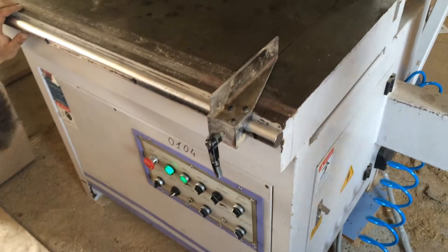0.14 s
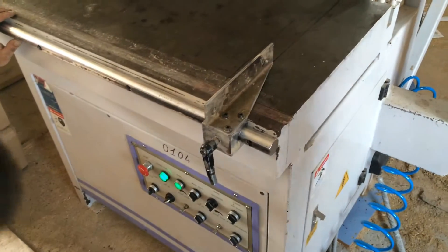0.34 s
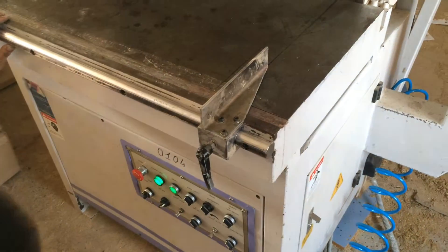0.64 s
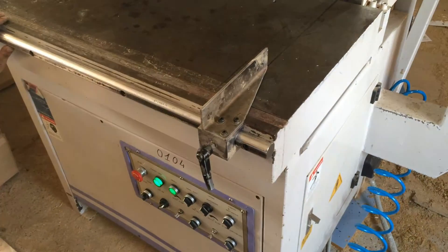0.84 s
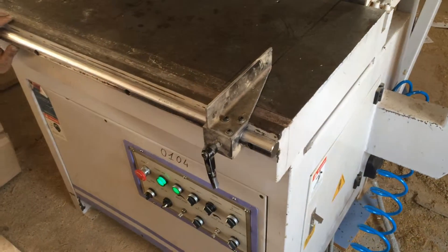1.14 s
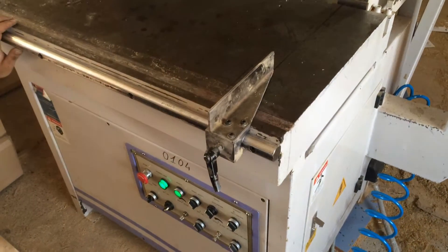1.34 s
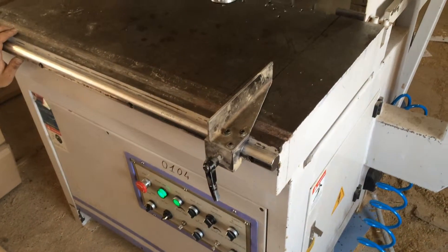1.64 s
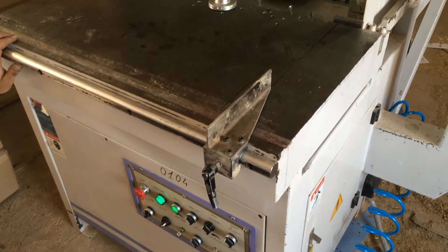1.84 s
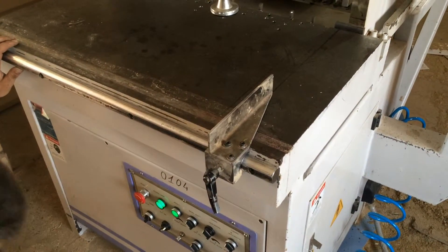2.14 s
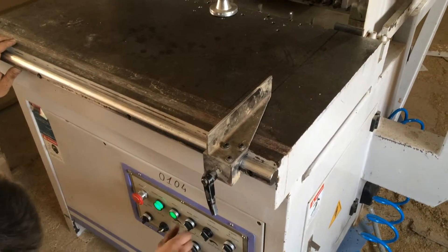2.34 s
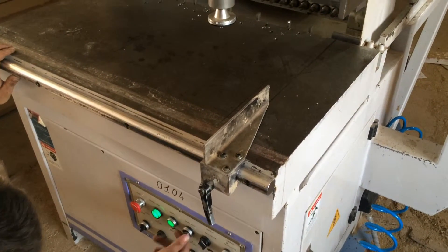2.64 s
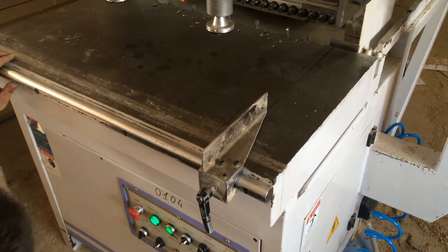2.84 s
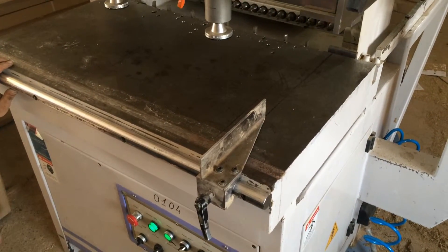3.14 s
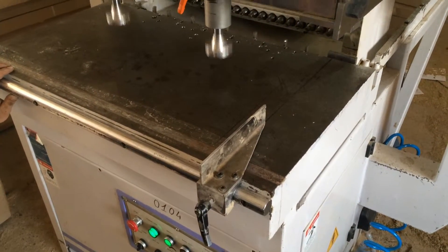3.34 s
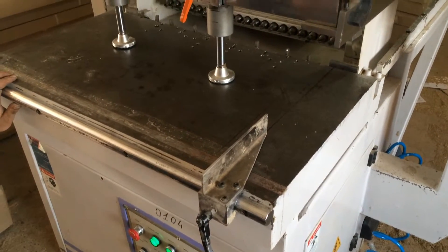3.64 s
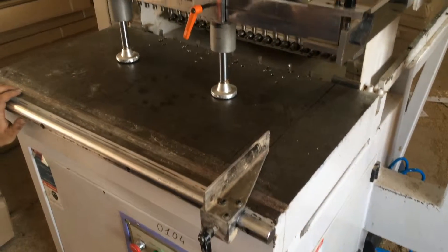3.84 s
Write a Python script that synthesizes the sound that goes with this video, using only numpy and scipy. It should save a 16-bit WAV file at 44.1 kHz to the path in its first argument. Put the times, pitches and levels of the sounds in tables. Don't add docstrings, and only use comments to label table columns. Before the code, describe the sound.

A pneumatic drilling machine idles in a workshop with soft leaking-air hiss and faint low hum. Feet scuff and knock quietly near 0.6 s and 2.3 s. Sharp relay and contactor clicks come at 1.5 and 1.8 s, weaker ones at 2.0 and 2.7. At 3.4 s a valve clacks, air bursts and cylinders thump; from 3.5 clamps clatter on steel, then gear whine and jet hiss grow to the end.

```python
import sys
import numpy as np
from scipy import signal
from scipy.fft import rfft, irfft
from scipy.io import wavfile

SR = 44100
rng = np.random.default_rng(int(sys.argv[2]) if len(sys.argv) > 2 else 0)


def wrap_up_sound(samples):
    columns = np.atleast_2d(samples).T
    tamed = np.clip(columns, -1, 1)
    steps = np.round(tamed * 32767).astype(np.int16)
    wavfile.write(sys.argv[1], SR, steps)


def nominal_scale(level):
    x = np.asarray(level, float) / 20
    return 10 ** x


N = 176400


def rms_one(x):
    return x / np.sqrt(np.mean(x ** 2) + 1e-20)


def envelope(rows):
    time_s, level_db = np.transpose(rows)
    return nominal_scale(np.interp(np.arange(N) / SR, time_s, level_db, left=-120))


def drift(rate_hz):
    step = 40
    r = np.exp(-2 * np.pi * rate_hz * step / SR)
    noise = rng.standard_normal(N // step + 2002)
    slow = signal.lfilter([1], [1, -2 * r, r * r], noise)[2000:]
    return np.interp(np.arange(N) / step, np.arange(len(slow)), rms_one(slow - slow.mean()))


def air(spectrum, resonances):
    hz = np.maximum(np.arange(N // 2 + 1) * SR / N, 1)
    point_hz, point_db = np.transpose(spectrum)
    db = np.interp(np.log(hz), np.log(point_hz), point_db)
    for mid_hz, width_hz, lift_db in resonances:
        db = db + lift_db * np.exp(-.5 * (2 * (hz - mid_hz) / width_hz) ** 2)
    return rms_one(irfft(rfft(rng.standard_normal(N)) * nominal_scale(db) * (hz > 20), N))


def ring(x, hz, t60_s):
    r, w = nominal_scale(-60 / (t60_s * SR)), 2 * np.pi * hz / SR
    return signal.lfilter([0, np.sin(w)], [1, -2 * r * np.cos(w), r * r], x + 1e-18)


def strike(hits, modes, contact_s, spread_db):
    out = np.zeros(N)
    luck = rng.standard_normal((len(hits), len(modes)))
    start_s, level_db = np.transpose(hits)
    push = np.sin(np.pi * np.clip((np.arange(256) + .5) / SR / contact_s, 0, 1)) ** 2
    for k, (hz, mode_db, t60_s) in enumerate(modes):
        force = np.zeros(N)
        force[(start_s * SR).astype(int)] = nominal_scale(level_db + mode_db + spread_db * luck[:, k])
        out += ring(force, hz, t60_s)
    low_cut = signal.butter(4, .75 * modes[0][0], "high", fs=SR, output="sos")
    return signal.sosfilt(low_cut, np.convolve(out, push / push.sum())[:N])


def burst(hits, noise, t60_s):
    start_s, level_db = np.transpose(hits)
    power = np.zeros(N)
    power[(start_s * SR).astype(int)] = nominal_scale(2 * level_db)
    decay = nominal_scale(-120 / (t60_s * SR))
    return noise * np.sqrt(signal.lfilter([1], [1, -decay], power + 1e-18))


def shop(x):
    t60_s, dull_hz = 0.47, 5300
    t = np.arange(SR // 2) / SR
    dull = np.exp(-2 * np.pi * dull_hz / SR)
    tail = signal.lfilter([1], [1, -dull], rng.standard_normal(SR // 2))
    tail = tail * nominal_scale(-60 * t / t60_s) * (t > .006)
    return signal.fftconvolve(x, tail / np.sqrt(np.sum(tail ** 2)))[:len(x)]


def mains_hum():
    hum_hz, hum_db, wobble_db = 100.2, -59.5, 1.5
    tone = np.sin(2 * np.pi * hum_hz * np.arange(N) / SR)
    return np.sqrt(2) * nominal_scale(hum_db + wobble_db * drift(11)) * tone


# pitch_hz, density_db (per Hz)
LEAK_SPECTRUM = [(18, -48), (30, -6), (97, -5.5), (321, -9.5), (667, -13), (1280, -2.5), (1750, -6.5),
                 (3100, -7.5), (15200, -12)]
# pitch_hz, width_hz, lift_db
CABINET_RESONANCES = [(30, 19, -14.5), (104, 175, -2.5), (201.2, 26, 6.5), (327.5, 64, 11),
                      (1260, 900, 1.5), (2420, 700, 3.5), (3460, 650, 8.5), (4780, 720, 9), (7470, 1500, 2),
                      (10500, 320, -6.5), (15200, 1500, -7)]
# time_s, level_db
SUPPLY_PRESSURE = [(0, 0), (3.4, 0), (3.6, -4), (4, -4.5)]
# pitch_hz, width_hz, level_db
LEAK_WHISTLES = [(1296.4, 15, -50.5), (1399, 4.7, -56), (2460, 8, -56), (2635, 44, -52.5), (3107, 12, -57),
                 (3650, 14, -97.5), (4430, 28, -69.5)]


def leak():
    level_db, patchy_db, wet_db = -38.5, 0.67, 3.5
    hiss = air(LEAK_SPECTRUM, CABINET_RESONANCES)
    hiss = rms_one(hiss + nominal_scale(wet_db) * shop(np.tile(hiss, 2))[N:])
    out = envelope(SUPPLY_PRESSURE) * nominal_scale(level_db + patchy_db * drift(11.0)) * hiss
    for hz, width_hz, whistle_db in LEAK_WHISTLES:
        out += nominal_scale(whistle_db) * rms_one(ring(rng.standard_normal(N), hz, 2.0 / width_hz))
    return out


# start_s, length_s, level_db, low_hz, top_hz
FLOOR_SCUFFS = [
    (0.5, 0.17, -52, 64, 280),
    (2.85, .12, -58, 28, 90),
    (.625, .06, -47.5, 252, 267),
    (.62, 0.082, -55, 535, 540),
    (.675, .03, -50, 74, 130),
    (2.302, 0.18, -46, 123, 270),
    (2.31, 0.17, -47.5, 656, 754),
]
# start_s, level_db
FLOOR_KNOCKS = [
    (.5845, -47),
    (.5885, -47),
    (.5925, -43),
    (.5965, -41),
]
# pitch_hz, level_db, t60_s
FLOORBOARD_MODES = [(130, -14, 0.064), (176, -14, .06), (270, 5.5, 0.057)]


def scuffs():
    t = np.arange(N) / SR
    out = strike(FLOOR_KNOCKS, FLOORBOARD_MODES, contact_s=0.00088, spread_db=-3.0)
    for start_s, length_s, level_db, low_hz, top_hz in FLOOR_SCUFFS:
        band = signal.butter(2, [low_hz, top_hz], "band", fs=SR, output="sos")
        noise = rms_one(signal.sosfilt(band, rng.standard_normal(N)))
        swell = np.sqrt(np.sin(np.pi * np.clip((t - start_s) / length_s, 0, 1)).clip(0))
        out += nominal_scale(level_db + 2 * drift(4.4)) * noise * swell
    return out


# start_s, level_db
RELAY_TOUCHES = [(1.5128, -29), (1.5142, -21), (1.5158, -13.5), (1.519, -16), (1.9945, -23.5),
                 (1.997, -22.5), (2.0005, -24), (2.005, -60), (2.689, -33), (2.693, -42), (2.6975, -26.5),
                 (3.423, -16), (3.567, -17.5)]
# pitch_hz, density_db (per Hz)
SNAP_SPECTRUM = [(180, -46), (300, -18), (979, -12.5), (3580, -8), (5230, -10.5), (6370, -10.5),
                 (8840, -12), (11100, -21.5), (15200, -25)]
# pitch_hz, width_hz, lift_db
SNAP_RESONANCES = [(970, 146, 11.5), (2300, 900, 6), (3780, 300, 0), (9300, 500, 5), (10200, 1100, -5),
                   (13700, 600, 3), (15000, 800, 5)]
# start_s, level_db
SPRING_TOUCHES = [
    (1.5155, -10),
    (1.52007, -12),
    (1.998, -26),
    (3.423, -13),
]
# pitch_hz, level_db, t60_s
RELAY_MODES = [(320, -22, .05), (460, -24, .04), (1040, -15, .04), (2720, -18, .03), (5265, -10.5, .065),
               (5250, -23, .12), (5790, -24, .04)]


def relays():
    snap = burst(RELAY_TOUCHES, air(SNAP_SPECTRUM, SNAP_RESONANCES), t60_s=0.025)
    return snap + strike(SPRING_TOUCHES, RELAY_MODES, contact_s=.00005, spread_db=1.2)


# start_s, level_db
CONTACTOR_TOUCHES = [
    (1.8028, -12),
    (1.8034, -11),
    (1.8039, -10),
    (1.8102, -19.5),
    (1.8155, -37),
    (1.819, -26),
]
# start_s, level_db
SOLENOID_TOUCHES = [
    (3.3922, -13),
    (3.3928, -10.5),
    (3.3933, -10.5),
    (3.3949, -19),
    (3.4002, -17),
]
# pitch_hz, level_db, t60_s
CONTACTOR_MODES = [(1000, -23, .015), (1520, -9, .012), (1720, -9, .011), (1900, -2.5, .011),
                   (1836, -24, .09), (2164, -16, .03), (2444, -16, .02), (2907, -8, .022),
                   (3386, -12, .015), (4016, -3, .014), (4700, -18, .01), (6700, -27, .012),
                   (13500, -28, .01)]
# pitch_hz, density_db (per Hz)
HOUSING_SPECTRUM = [(500, -28), (1200, -12), (1550, -6), (1850, 9), (2200, -11), (3000, -11), (4500, -40),
                    (15000, -30)]


def contactor_and_solenoid():
    contactor = strike(CONTACTOR_TOUCHES, CONTACTOR_MODES, contact_s=.00006, spread_db=1.2)
    solenoid = strike(SOLENOID_TOUCHES, CONTACTOR_MODES, contact_s=.0003, spread_db=1.2)
    buzz = burst(CONTACTOR_TOUCHES + SOLENOID_TOUCHES, air(HOUSING_SPECTRUM, []), t60_s=0.19)
    return contactor + solenoid + nominal_scale(-19.5) * buzz


# time_s, level_db
VALVE_FLOW = [(3.425, -34), (3.447, -15.5), (3.497, -15), (3.52, -31), (3.6, -46), (3.7, -66)]
# time_s, level_db
CYLINDER_FLOW = [(3.3925, -32), (3.397, -25), (3.406, -29), (3.411, -22.5), (3.418, -26), (3.424, -18.5),
                 (3.435, -15), (3.46, -35), (3.5, -30.5)]
# pitch_hz, density_db (per Hz)
RUSH_SPECTRUM = [(88, -37), (150, -9.5), (478, -0.5), (822, -3.5), (959, 1.5), (1500, -4.5), (2830, 2),
                 (4080, -4.5), (15200, 2.5)]
# pitch_hz, width_hz, lift_db
CYLINDER_RESONANCES = [(3120, 480, 7), (1718, 41, 16), (13400, 6500, -14)]


def air_rush():
    roar = air(RUSH_SPECTRUM, [(3114, 110, 8.6), (1700, 77, 3.3)])
    roar = envelope(VALVE_FLOW) * nominal_scale(0.83 * drift(40)) * roar
    sputter = nominal_scale(3 * drift(79))
    return roar + envelope(CYLINDER_FLOW) * sputter * air(RUSH_SPECTRUM, CYLINDER_RESONANCES)


# start_s, level_db
LURCH_KNOCKS = [
    (3.407, -18.5),
    (3.413, -24.5),
    (3.421, -24),
    (3.428, -19),
]
# pitch_hz, level_db, t60_s
FRAME_MODES = [(120.7, -2.5, 0.11), (347, -2.5, .06), (570, -7.5, 0.079), (1010, -10, 0.059)]


def cylinder_lurch():
    return strike(LURCH_KNOCKS, FRAME_MODES, contact_s=0.0014, spread_db=6.0)


# start_s, level_db
CLAMP_BOUNCES = [(3.5045, -12), (3.5085, -13.5), (3.515, -18), (3.52, -17), (3.5265, -17), (3.531, -17),
                 (3.543, -21), (3.551, -18), (3.558, -30), (3.569, -22), (3.584, -23), (3.599, -21.5),
                 (3.613, -24), (3.625, -33)]
# pitch_hz, level_db, t60_s
TABLE_MODES = [(141, -21.5, 0.15), (242, -19, 0.12), (279, -13.5, 0.14), (392, -24, 0.19),
               (491, -9.5, 0.089), (551, -6.5, 0.11), (703, -1, 0.08), (914, -12, 0.19),
               (1067, -14.5, 0.44), (1293, -8.5, 0.12), (1476, -15, 0.1), (1524, -11, 0.09),
               (1720, -20, 0.15), (1820, -16, 0.062)]
# pitch_hz, density_db (per Hz)
RATTLE_SPECTRUM = [(53, -50), (90, -24), (331, -34), (386, 8), (456, -15), (532, -3), (650, -3.5),
                   (1310, -1.5), (3500, -20), (4550, -22), (7700, -120)]


def clamps():
    table = strike(CLAMP_BOUNCES, TABLE_MODES, contact_s=0.00032, spread_db=3.0)
    return table + nominal_scale(-5.5) * burst(CLAMP_BOUNCES, air(RATTLE_SPECTRUM, []), t60_s=.24)


# start_s, level_db
WASHER_TICK = [
    (3.5425, -15.5),
]
# pitch_hz, level_db, t60_s
WASHER_MODES = [(6330, 2.5, 0.0093), (7000, 2, 0.011), (8200, -13, .01)]


def washer_tick():
    return strike(WASHER_TICK, WASHER_MODES, contact_s=.00005, spread_db=0.0)


# time_s, level_db
NOZZLE_FLOW = [(3.45, -62), (3.52, -31), (3.6, -28), (3.7, -24), (3.86, -21.5), (4.0, -21)]
# pitch_hz, density_db (per Hz)
JET_SPECTRUM = [(90, -52), (150, -47), (600, -34), (1200, -15), (2400, -13), (3800, -14), (7000, -10),
                (11000, -9), (15200, -10)]
# pitch_hz, width_hz, lift_db
NOZZLE_RESONANCES = [(2050, 300, 1.5), (3050, 1250, 5), (7100, 500, 1.5), (14800, 500, 2.5)]


def air_jet():
    return envelope(NOZZLE_FLOW) * nominal_scale(0.42 * drift(21)) * air(JET_SPECTRUM, NOZZLE_RESONANCES)


# multiple of shaft speed, level_db
GEAR_MESH = [(25, -49), (41, -38), (42, -41), (44, -46), (57, -42), (58, -43), (60, -40), (61, -44),
             (62, -42), (63, -29), (64, -44), (65, -39), (67, -47), (89, -46)]
# time_s, level_db
SPINDLE_LOAD = [(3.47, -33), (3.53, -5.5), (3.7, -1), (4.0, 1)]


def spindle():
    shaft_hz, wobble_db = 49.7, 1.2
    turn = 2 * np.pi * shaft_hz * np.arange(N) / SR
    tones = np.zeros(N)
    for multiple, level_db in GEAR_MESH:
        wobble = nominal_scale(level_db + wobble_db * drift(2.2))
        tones += wobble * np.sin(multiple * turn + rng.uniform(0, 2 * np.pi))
    return np.sqrt(2) * envelope(SPINDLE_LOAD) * tones


def scene():
    background = leak() + mains_hum() + scuffs()
    contactor = contactor_and_solenoid()
    blows = relays() + cylinder_lurch() + clamps() + washer_tick()
    rush = air_rush()
    reverb = nominal_scale(-14) * shop(blows + rush + nominal_scale(-9) * contactor)
    mix = background + contactor + blows + rush + air_jet() + spindle() + reverb
    return mix[None]


def low_pass(x):
    return signal.sosfilt(signal.butter(12, 16200, fs=SR, output="sos"), x)


def record(dry):
    rounded = .9 * np.tanh(dry / .9)
    top_cut = signal.ellip(16, .5, 70, 15290, fs=SR, output="sos")
    finished = signal.sosfilt(top_cut, rounded)
    return low_pass(finished)


dry = scene()
out = record(dry)
wrap_up_sound(out)
```